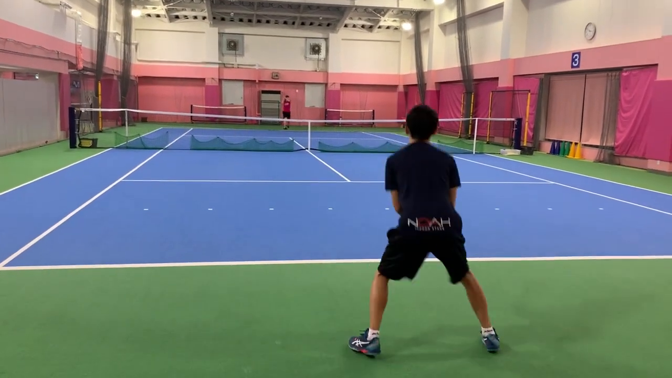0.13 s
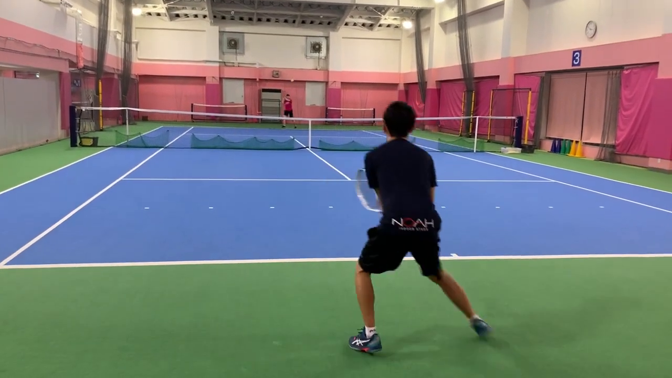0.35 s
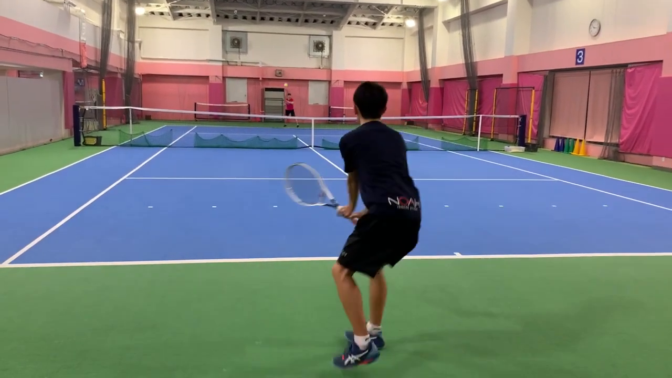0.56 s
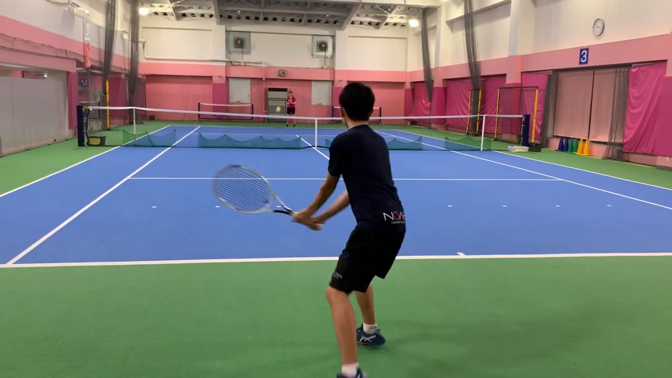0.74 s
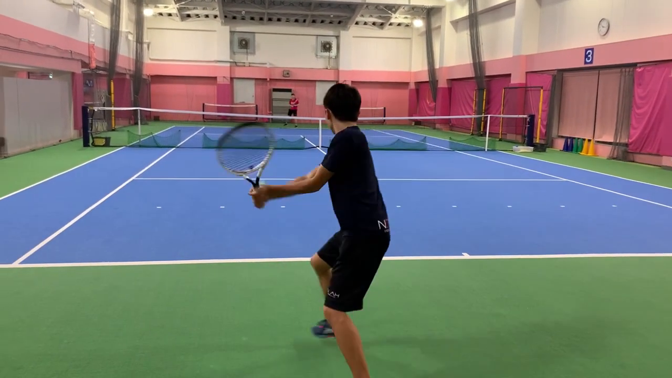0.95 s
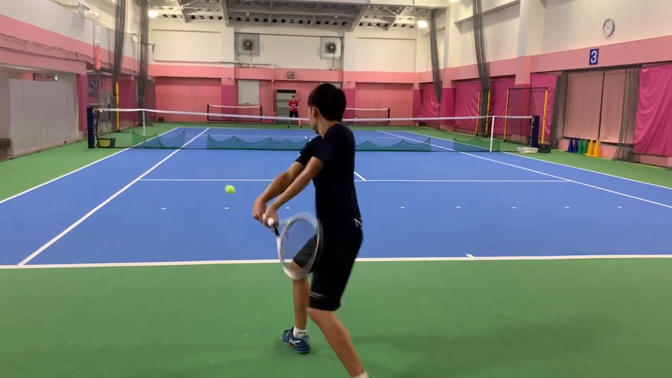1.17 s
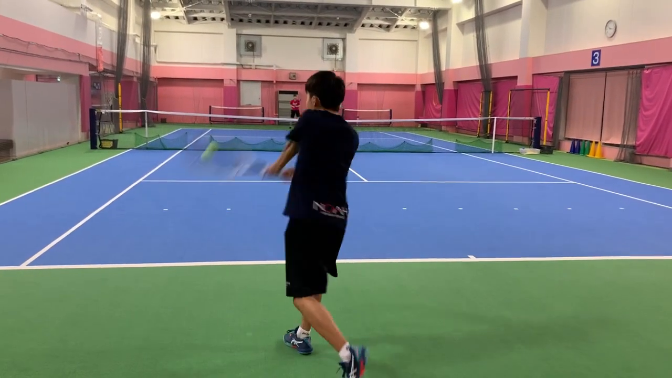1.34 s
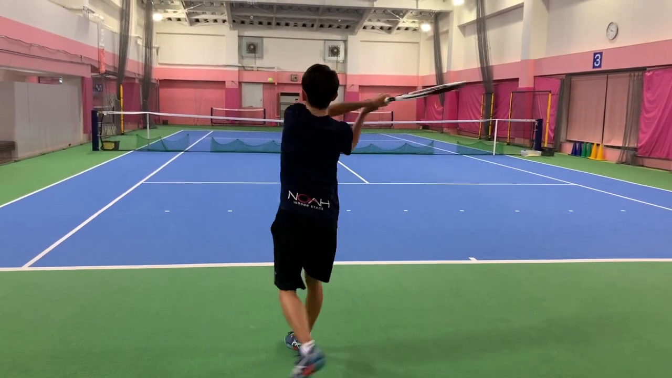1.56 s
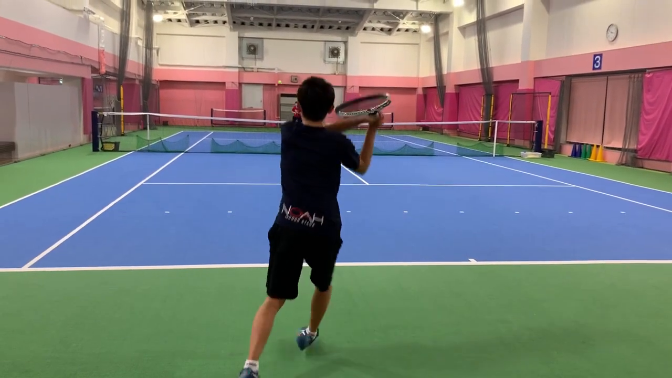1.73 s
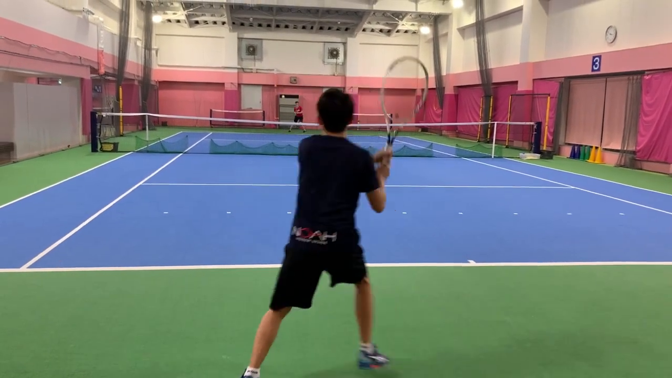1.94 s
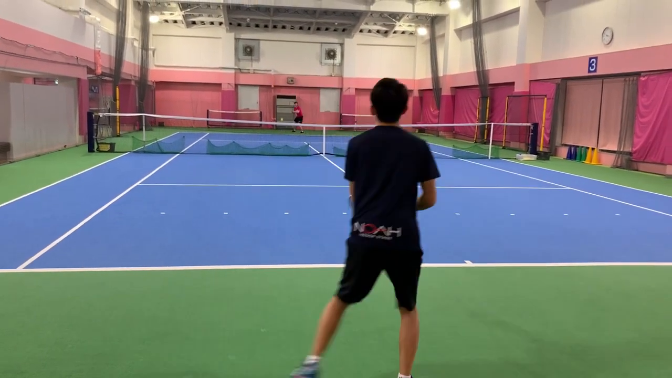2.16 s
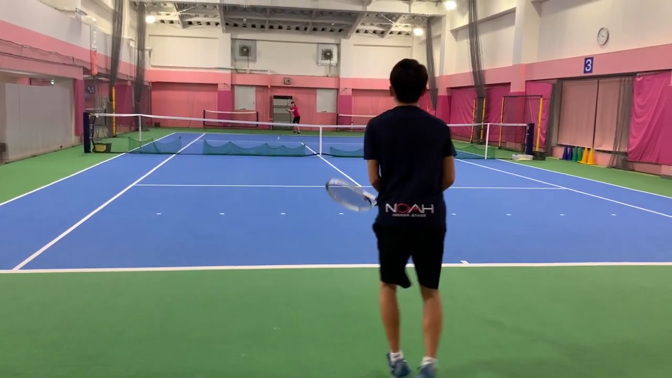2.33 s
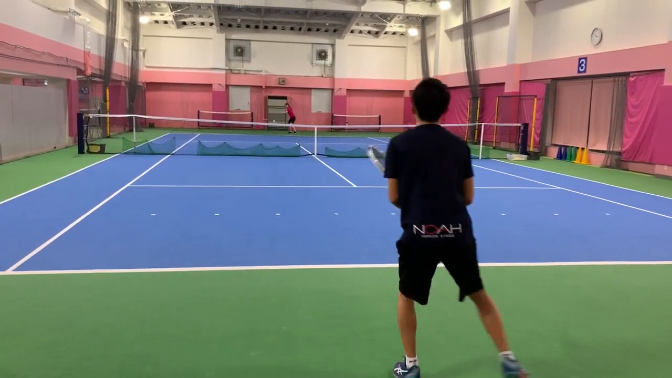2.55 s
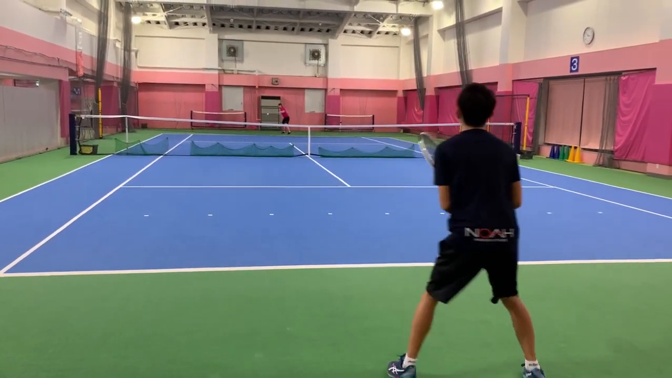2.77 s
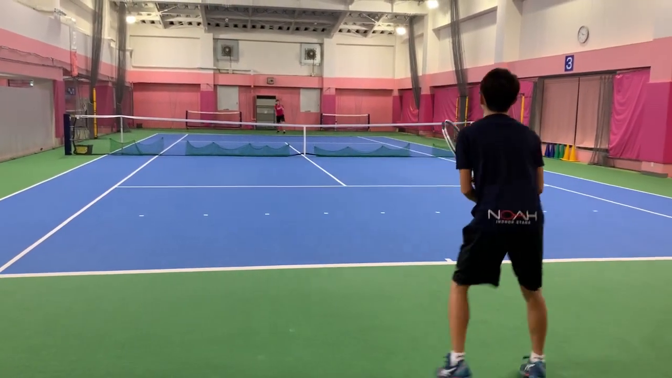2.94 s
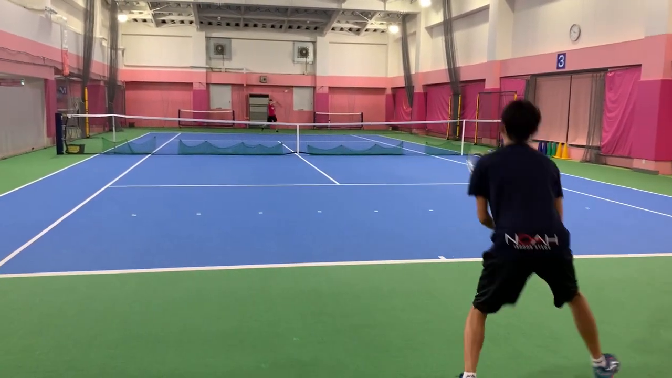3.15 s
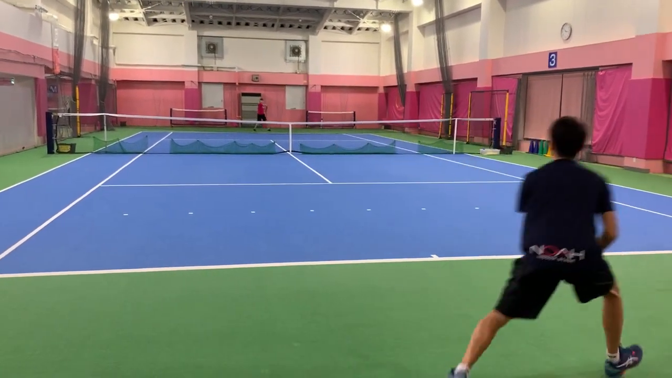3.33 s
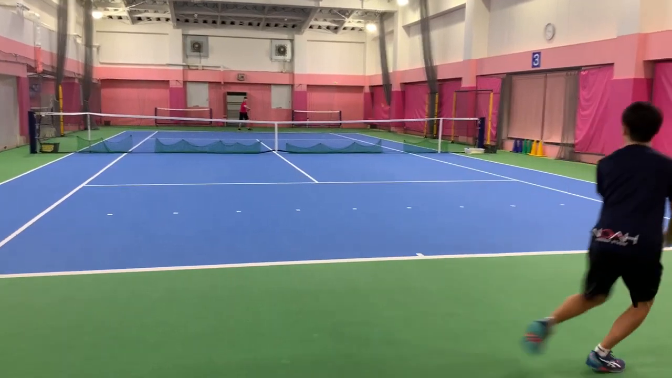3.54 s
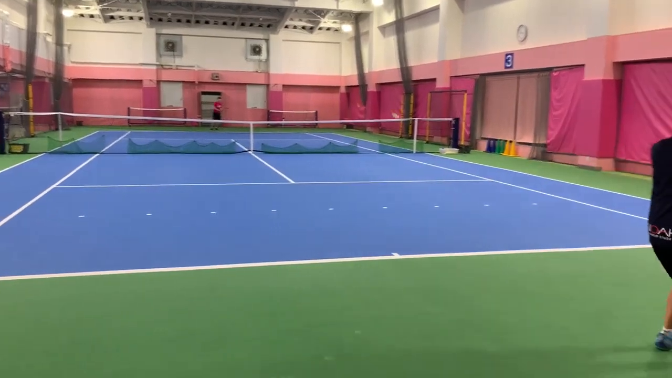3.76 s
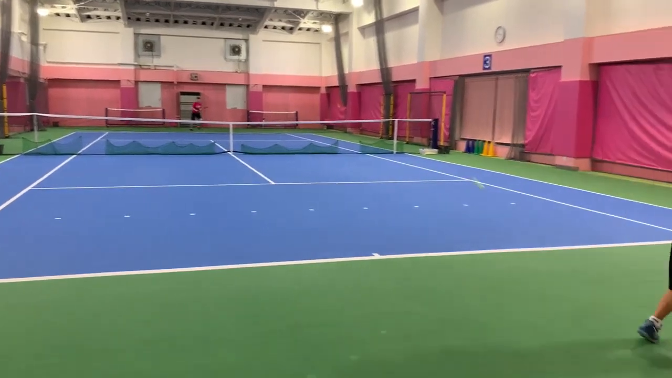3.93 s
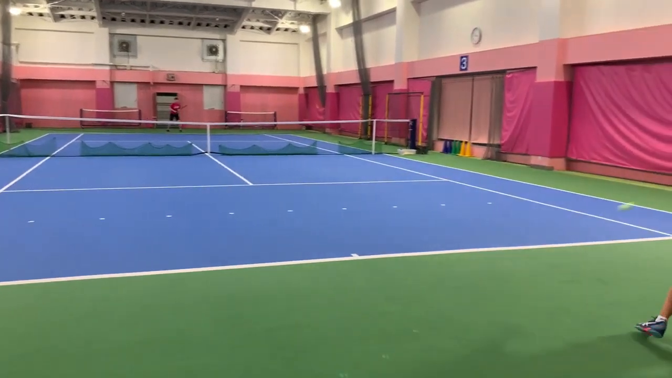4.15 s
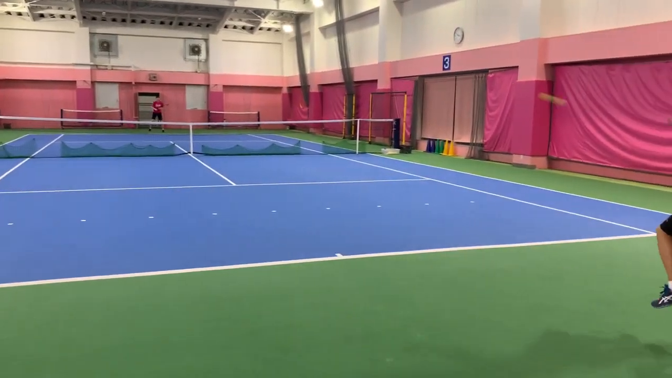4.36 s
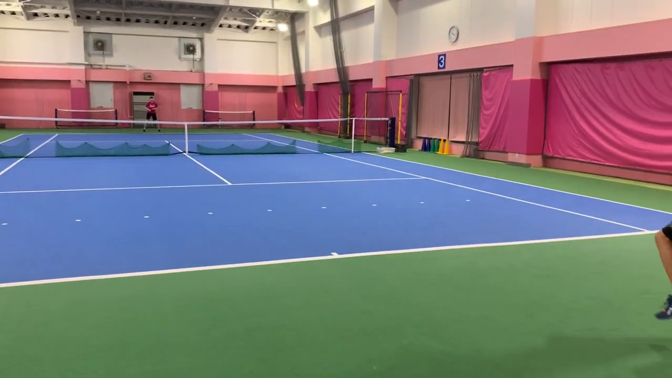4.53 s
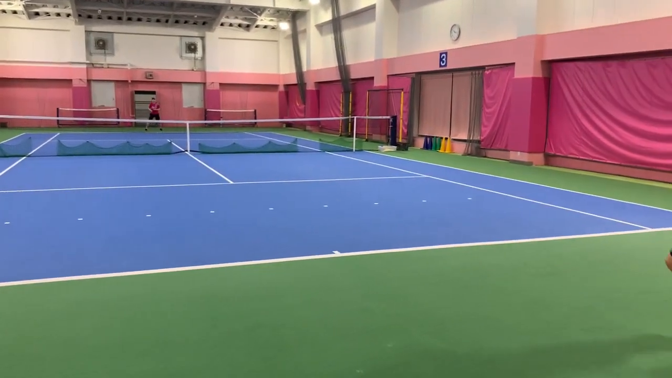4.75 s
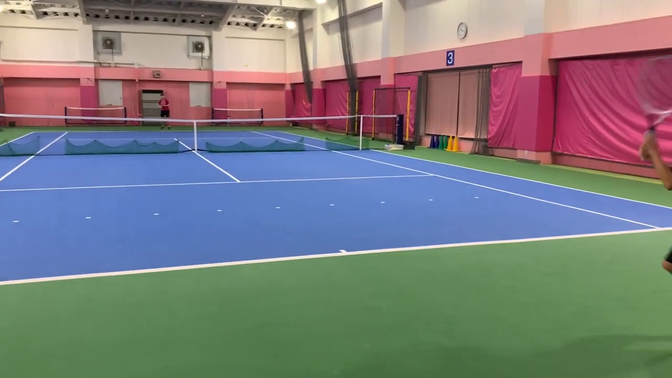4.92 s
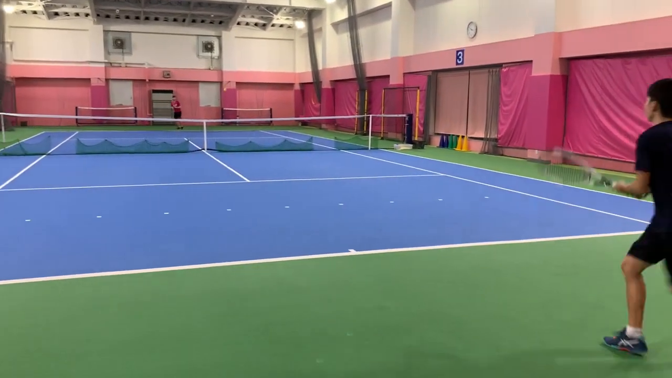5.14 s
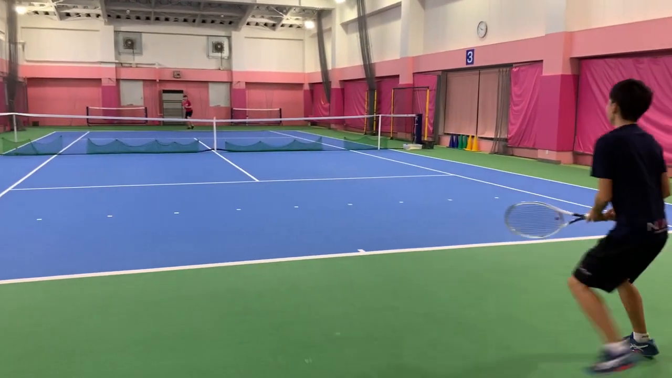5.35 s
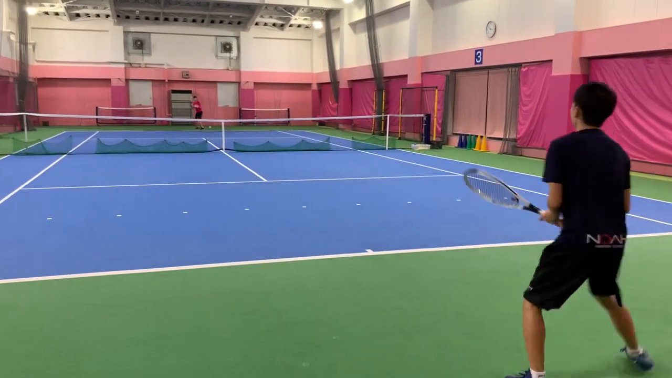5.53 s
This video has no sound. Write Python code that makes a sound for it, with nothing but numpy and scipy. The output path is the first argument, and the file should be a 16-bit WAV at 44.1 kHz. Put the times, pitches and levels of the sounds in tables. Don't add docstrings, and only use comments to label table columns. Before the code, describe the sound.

A tennis rally in a big, hard-walled indoor hall, heard in stereo from just behind the near player. Right at the start a distant racket blow gives a hollow, rounded pop that blooms into more than a second of echo. Shoes thump softly at 0.2 s and more firmly at 0.8 s. The ball bounces with a dull thud at about 1.1 s, then a close backhand cracks loudly at 1.4 s after a short swish, with crisp string scrape and quick wall echoes. Light steps and a scuff follow from 1.75 to 3 s. Another far hit rings at 3.1 s. Running steps and scuffs lead to a second bounce at 4.1 s and a near forehand at 4.4 s, duller and slightly right. The echo fades through a few faint steps and scuffs until about 5.5 s. Low ventilation rush and a droning duct hum continue throughout.

```python
import sys
import numpy as np
from scipy import signal
from scipy.fft import rfft, irfft, next_fast_len
from scipy.io import wavfile
from scipy.ndimage import uniform_filter1d, map_coordinates

SR = 44100
rng = np.random.default_rng(int(sys.argv[2]) if len(sys.argv) > 2 else 0)


def file_out(sig):
    cols = np.atleast_2d(sig).T
    lim = np.clip(cols, -1, 1)
    pcm = np.round(lim * 32767).astype(np.int16)
    wavfile.write(sys.argv[1], SR, pcm)


def volts_from_decibels(level):
    exponent = np.asarray(level, float) / 20
    return 10 ** exponent


N = 246512

# f/Hz, left minus right/dB
PORT_BALANCE = [(60, -1), (110, -2), (200, -2.5), (380, -2.5), (700, 0), (1290, 0.5), (2380, -1.5),
                (4400, -1.5), (8120, -1), (15000, 2.5)]


def rackets():
    # t/s, blow level/dB, hall level/dB, scrape level/dB, floor echo/dB
    blows = [
        (.0462, -17.5, -4.5, -36, -25),
        (1.3958, -8, -2, -17.5, 8),
        (3.075, -11, -2, -42, -17.5),
        (4.3634, -12, -4, -27, 2),
    ]
    # f/Hz, bandwidth/Hz, level/dB
    blow_modes = [
        [(153, 11, -4.5), (288, 123, -1.5), (398, 323, -9), (993, 186, -8), (1730, 60, -21.5),
         (2390, 350, -29.5), (3200, 120, -22.5), (3700, 650, -30), (4884, 1600, -33), (7960, 4590, -38.5)],
        [(153.4, 38, -0.5), (272, 77, 1), (376, 173, 1.5), (927, 192, -3.5), (1120, 120, -9), (1704, 170, -20),
         (2364, 250, -19), (3095, 110, -18), (4170, 1030, -25.5), (8500, 2500, -44.5)],
        [(153, 49, 0), (293, 123, 6), (406, 210, 0), (984, 135, 6.5), (1510, 1500, -24), (2394, 160, -13.5),
         (3090, 480, -25), (4920, 680, -34), (5900, 560, -51), (8000, 15000, -42)],
        [(195, 175, -6), (414, 170, -6), (922, 310, -8), (1880, 67, -50), (2280, 1250, -29),
         (4440, 3500, -29.5), (6600, 4000, -51), (8600, 1300, -40)],
    ]
    # f/Hz, spectral density level/dB
    scrape_spectra = [
        [(2000, -22), (4200, -14), (5900, 4), (6800, -14), (7900, -7), (9600, 0), (11000, -9), (12600, -9),
         (14200, 0), (16300, -32)],
        [(2000, -14), (3500, -10), (5300, -9), (6500, 0), (7700, -13), (8800, -6), (10300, -10), (12600, -11),
         (14000, -7), (16300, -32)],
    ]
    # delay after blow t/s, level/dB, left lead/ms
    wall_echoes = [(0.022, -3.5, .3), (.0263, -1, -.3), (.0315, -1, .15), (.0378, -3, -.1),
                   (0.058, -9.5, .25)]
    left_leads_ms = [.1, .1, .1, -.251]
    brush_s = [.0038, .0002, .0038, .0028]
    far_air_db_per_khz, far_top_hz = 4, 11500
    curtain_db_per_khz = [.85, .45]

    out = np.zeros((2, N))
    t = np.arange(SR // 20) / SR
    for k, (s, db, hall_db, scrape_db, floor_db) in enumerate(blows):
        near, stroke = k % 2, k // 2
        lead_ms = left_leads_ms[k]
        blow = impact(blow_modes[k], db, hall_db, lead_ms, near, size=2 * SR, floor_db=floor_db)
        if not near:
            blow = filtered(blow, lambda hz: 1 / (1 + (hz / far_top_hz) ** 12))
        add(out, s, blow)

        if k == 1:
            for delay, wall_db, wall_ms in wall_echoes:
                echo_db = db + floor_db + wall_db - 12
                echo = impact(blow_modes[k][3:], echo_db, -99, wall_ms, 0.77, size=SR // 5, floor_db=-4)
                add(out, s + delay, echo)

        def colour(hz):
            air_loss_db = (1 - near) * far_air_db_per_khz * (hz - 8000) / 1000
            return volts_from_decibels(along(scrape_spectra[stroke], hz) - air_loss_db)

        def room_colour(hz):
            return colour(hz) ** 0.66 * volts_from_decibels(-curtain_db_per_khz[stroke] * hz / 1000)

        grit = unit(filtered(rng.standard_normal(len(t)), colour))
        attack = (t / .0014) * np.exp(1 - t / .0014)
        scrape = grit * attack + .08 * grit * volts_from_decibels(-60 * t / .04)
        room = filtered(hall(near, size=SR // 2), room_colour)
        add(out, s - brush_s[k], volts_from_decibels(scrape_db) * ports(scrape, lead_ms))
        add(out, s + .002, volts_from_decibels(scrape_db + 25.5) * room)
    return out


def impact(body, db, hall_db, lead_ms, near, size, floor_db=-6, drag=.45):
    t = np.arange(SR // 5) / SR
    low = modes([m for m in body if m[0] < 1300])
    high = modes([(9000, 1, -99)] + [m for m in body if m[0] > 1300])
    push = np.sin(np.pi * np.clip(t / .0007, 0, 1)) ** 2
    soft = filtered(push, low) / (.00035 * SR)
    decay = np.exp(-t / .002) + drag * np.exp(-t / .009)
    rough = rng.standard_normal(len(t)) * (1 - np.exp(-t / .001)) * decay
    rough = filtered(rough / np.linalg.norm(rough), high)
    floor_echo = volts_from_decibels(floor_db) * np.roll(soft, round(.0042 * SR))
    direct = ports(soft + floor_echo + rough, lead_ms)
    direct = np.pad(direct, ((0, 0), (0, size - len(t))))
    radiated = soft + filtered(1. * (t == 0), high)
    wet = signal.fftconvolve(radiated[None], hall(near, size), axes=1)[:, :size]
    return (volts_from_decibels(hall_db) * wet + volts_from_decibels(db) * direct) / np.max(np.abs(soft))


def bounces():
    # t/s, thud level/dB, hall level/dB, left lead/ms, court boom level/dB
    landings = [
        (1.0838, -27, -25.5, 0.043, -21),
        (4.1079, -26, -23, -0.058, -25),
    ]
    # f/Hz, bandwidth/Hz, level/dB
    ball_modes = [(310, 110, 3.5), (1002, 215, -7), (2043, 790, -13.5), (3293, 3300, -21),
                  (5050, 2800, -26)]
    court_hz, court_t60_s, court_lag_s = 138.7, .13, .0033

    out = np.zeros((2, N))
    t = np.arange(SR // 5) / SR
    phase = 2 * np.pi * court_hz * t
    boom = np.sin(phase) * (1 + .6 * np.cos(phase)) * volts_from_decibels(-60 * t / court_t60_s)
    for s, db, hall_db, lead_ms, boom_db in landings:
        add(out, s, impact(ball_modes, db, hall_db, lead_ms, near=0.49, size=SR, floor_db=-3, drag=.08))
        add(out, s + court_lag_s, volts_from_decibels(boom_db) * ports(boom, lead_ms))
    return out


def air():
    # heard from t/s, until t/s, level/dB
    flights = [
        (1.02, 1.2, -77),
        (3.5, 4.29, -79.5),
    ]
    # contact t/s, level then/dB, rise/(dB per s)
    swings = [
        (1.397, -47, 703),
        (4.36, -51, 1200),
    ]
    # f/Hz, spectral density level/dB
    swish_spectrum = [(150, -14), (450, 14), (1200, 4), (3000, -4.5), (6500, -4.5), (9500, -5), (13200, 1),
                      (15500, -31)]
    swell_s, fade_s, depth_db = .16, .06, 14
    stop_s = .00603

    whistle = unit(filtered(diffuse(N), lambda hz: modes([(5200, 900, 0)])(hz) ** 2))
    swish = unit(filtered(diffuse(N), lambda hz: volts_from_decibels(along(swish_spectrum, hz))))
    flight = 0
    for s, end, db in flights:
        hold_s = end - s - swell_s - fade_s
        flight = flight + gain(s + swell_s, db, depth_db / swell_s, hold_s, depth_db / fade_s)
    swing = sum(gain(s, db, rise, 0, 30 / stop_s) for s, db, rise in swings)
    return volts_from_decibels(13.5) * flight * whistle + volts_from_decibels(8) * swing * swish


def shoes():
    # t/s, peak level/dB, scuff level/dB
    footfalls = [(0.207, -28, -68), (0.817, -13.5, -88), (1.751, -27, -51), (1.963, -31.5, -84),
                 (2.272, -36, -83), (2.487, -23, -74.5), (2.974, -33, -83), (3.434, -46.5, -59),
                 (3.771, -29, -53), (4.148, -19.5, -64), (4.301, -38, -55), (4.751, -33, -76),
                 (5.187, -41.5, -51.5), (5.499, -56.5, -51)]
    # f/Hz, bandwidth/Hz, level/dB
    sole_modes = [(124, 18, 3.5), (287, 81, -23), (840, 110, -37)]
    # f/Hz, spectral density level/dB
    rubber_spectrum = [(2000, -29), (5000, 5), (9000, -6), (14000, -9), (16000, -41)]

    out = np.zeros((2, N))
    t = np.arange(SR // 10) / SR
    for s, db, scuff_db in footfalls:
        add(out, s, impact(sole_modes, db - 9, db - 13, 0, near=0, size=SR // 2))
        rub = unit(filtered(diffuse(len(t)), lambda hz: volts_from_decibels(along(rubber_spectrum, hz))))
        envelope = (t / .021) * np.exp(1 - t / .0089)
        add(out, s - .01, volts_from_decibels(scuff_db - 7) * rub * envelope)
    return out


def ventilation():
    # f/Hz, spectral density level/dB
    rush_spectrum = [(13, -45), (30, -10.5), (55, -0.5), (112, -6.5), (150, -5), (300, -6.5), (620, -19.5),
                     (1000, -22), (2000, -33.5), (4000, -42), (6500, -55.5), (7300, -77), (10300, -75),
                     (14800, -72)]
    # f/Hz, bandwidth/Hz, level/dB
    duct_tones = [(54, 4.7, -70.5), (147.3, 2.76, -43.5)]

    z = signal.stft(diffuse(N), nperseg=1024)[2]
    patches = rng.standard_normal(z.shape[1:])
    patches = uniform_filter1d(uniform_filter1d(patches, 8, 0), 8, 1)
    rush = signal.istft(z * volts_from_decibels(1.3 * unit(patches)), nperseg=1024)[1][:, :N]
    out = volts_from_decibels(-38) * unit(filtered(rush, lambda hz: volts_from_decibels(along(rush_spectrum, hz))))
    for tone_hz, width_hz, db in duct_tones:
        out = out + volts_from_decibels(db) * unit(filtered(diffuse(N), modes([(tone_hz, width_hz, 0)])))
    return out


def hall(near, size):
    # f/Hz, t60/s
    decay_times = [(60, 1.6), (150, 3.2), (300, 1.58), (600, 1.98), (1000, 2.45), (2000, 1.68),
                   (4000, 1.125), (7000, 0.67), (11000, 0.33), (16000, .3)]
    hz, t, z = signal.stft(diffuse(size), SR, nperseg=256)
    decay = volts_from_decibels(-60 * t / along(decay_times, hz)[:, None])
    tail = signal.istft(z * decay, SR, nperseg=256)[1][:, :size]
    t = np.arange(size) / SR
    clumps = map_coordinates(rng.standard_normal(size // 100 + 4), [np.arange(size) / 100])
    clumps_db = 2.2 * clumps * np.exp(-t / .1)
    return tail * volts_from_decibels(clumps_db + arrivals_db(t, near)) / np.sqrt(SR / 10)


def arrivals_db(t, near):
    gap_db = (near * 23 + (1 - near) * 50) * np.exp(-t / .003)
    lull_db = near * -2.5 * np.exp(-((t - .145) / .046) ** 2)
    side_walls_db = 2.5 * np.exp(-t / .062)
    return side_walls_db + lull_db - gap_db


def diffuse(size):
    # f/Hz, side minus mid/dB
    side_level = [(60, -13.5), (110, -15.5), (200, -14), (380, -8.5), (700, -1.5), (1290, -2.5), (2380, 1),
                  (4400, -1), (8120, 0.5), (15000, -3)]
    noise = rng.standard_normal((2, size))
    mid, side = filtered(noise, lambda hz: [hz * 0 + 1, volts_from_decibels(along(side_level, hz))])
    stereo = np.array([mid + side, mid - side])
    return filtered(stereo, lambda hz: volts_from_decibels(np.outer([.5, -.5], along(PORT_BALANCE, hz))))


def ports(x, lead_ms):
    half = np.array([[.5], [-.5]])

    def response(hz):
        return volts_from_decibels(half * along(PORT_BALANCE, hz)) * np.exp(2j * np.pi * half * hz * lead_ms / 1000)

    return filtered(x[None], response)


def modes(table):
    def response(hz):
        total = 0
        for k, (centre, width_hz, db) in enumerate(table):
            sign = (-1) ** (k + (centre > 800))
            damping = 1j * hz * width_hz
            total = total + sign * volts_from_decibels(db) * damping / (centre * centre - hz * hz + damping)
        return total

    return response


def filtered(x, response):
    m = next_fast_len(x.shape[-1] + 8192)
    return irfft(rfft(x, m) * response(np.fft.rfftfreq(m, 1 / SR)), m)[..., :x.shape[-1]]


def along(points, hz):
    f, v = np.transpose(points)
    return np.interp(np.log(hz + 1), np.log(f + 1), v)


def gain(s, db, rise_db_per_s, hold_s, fall_db_per_s):
    t = np.arange(N) / SR - s
    return volts_from_decibels(db + rise_db_per_s * np.minimum(t, 0) - fall_db_per_s * np.maximum(t - hold_s, 0))


def unit(x):
    return x / np.sqrt(np.mean(x ** 2) + 1e-20)


def add(out, s, x):
    part = out[:, round(s * SR):][:, :x.shape[1]]
    part += x[:, :part.shape[1]]


def scene():
    return rackets() + bounces() + air() + shoes() + ventilation()


def top_cut(x):
    return signal.sosfilt(signal.butter(12, 16440, fs=SR, output="sos"), x)


def record(dry):
    # f/Hz, level/dB
    overall_response = [(10950, 0), (11250, -30), (12200, -30), (12450, 0), (15000, 0), (15600, -8),
                        (16300, -20), (16450, -60)]
    heard = filtered(dry, lambda hz: volts_from_decibels(along(overall_response, hz)))
    heard = heard / (1 + np.abs(heard / .95) ** 6) ** (1 / 6)
    return top_cut(heard)


dry = scene()
out = record(dry)
file_out(out)
```